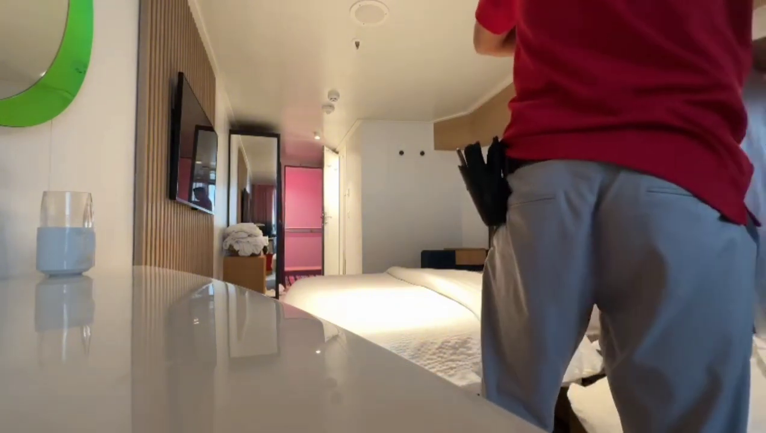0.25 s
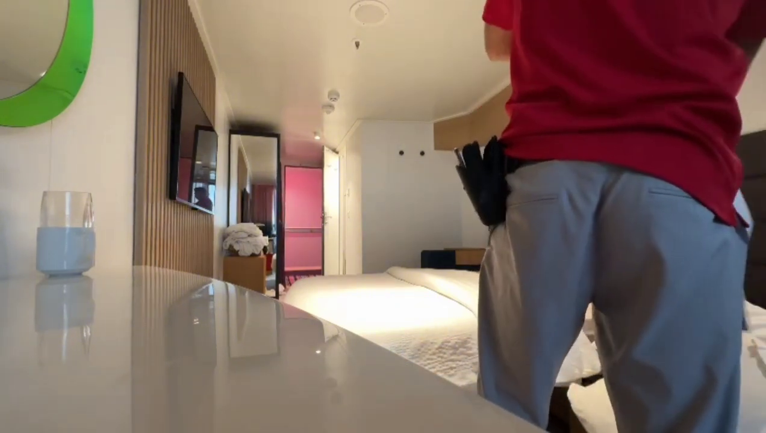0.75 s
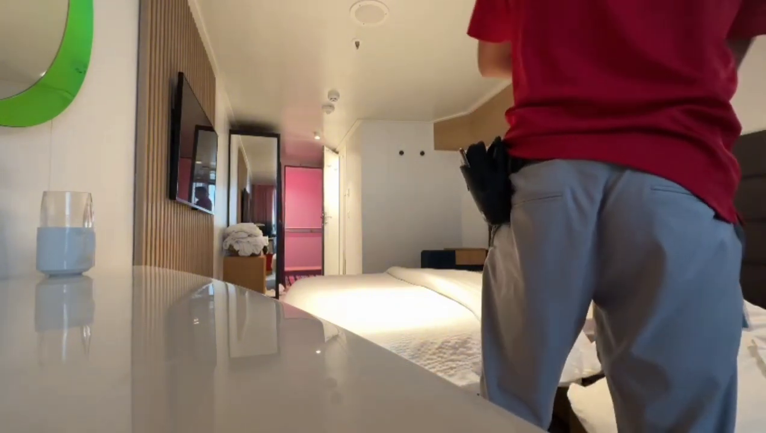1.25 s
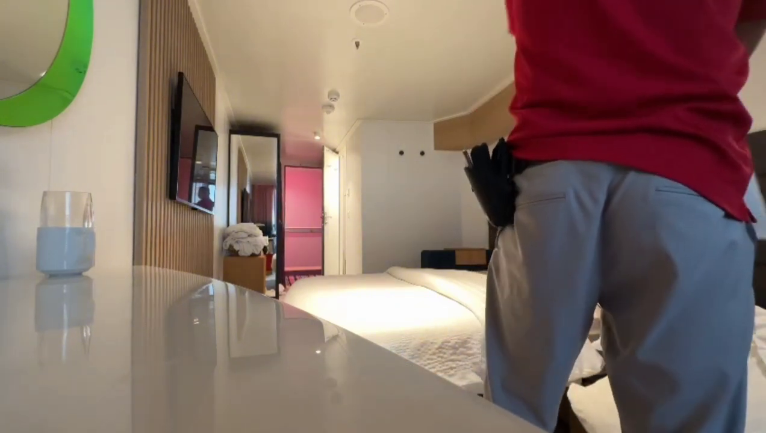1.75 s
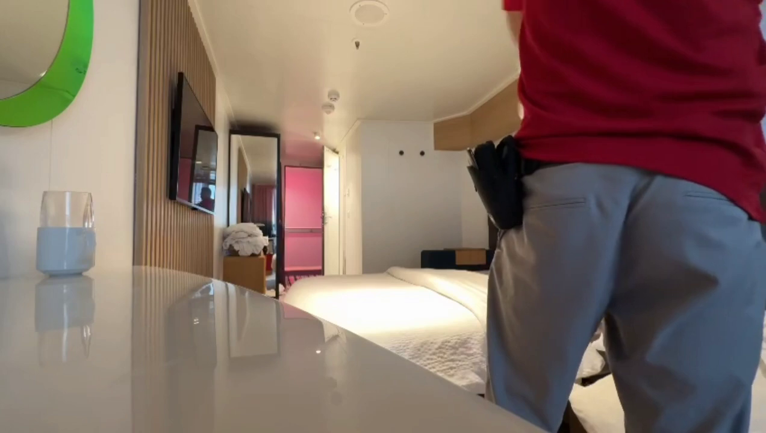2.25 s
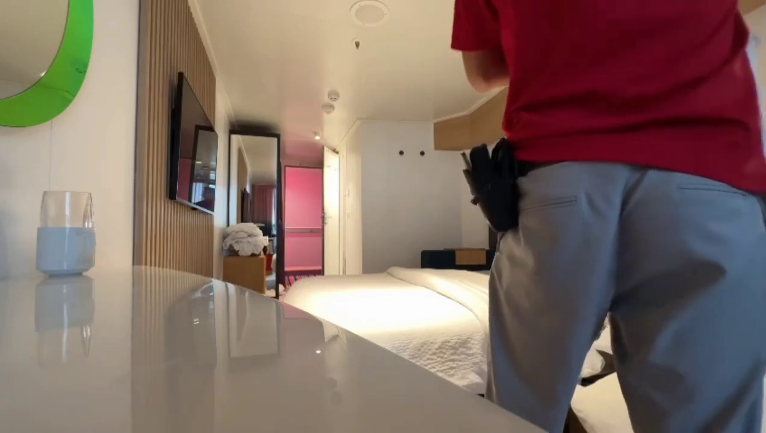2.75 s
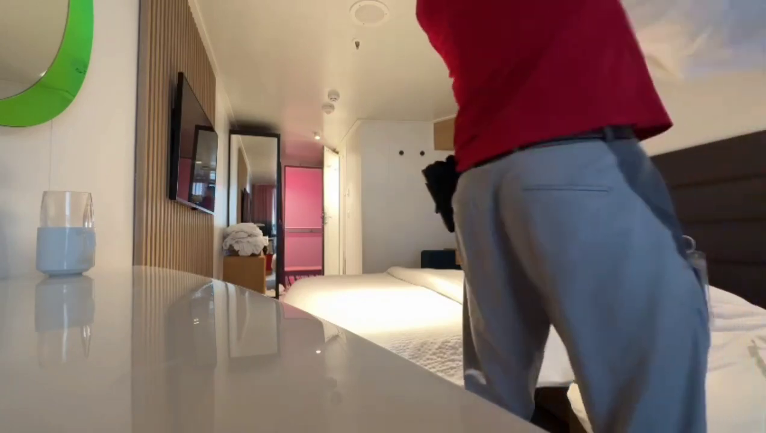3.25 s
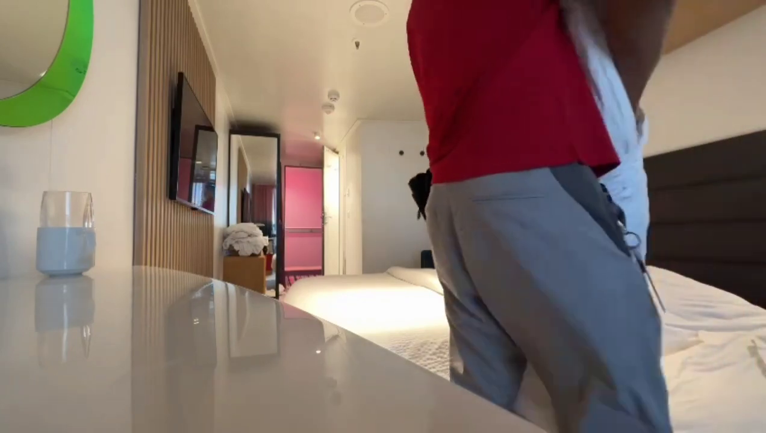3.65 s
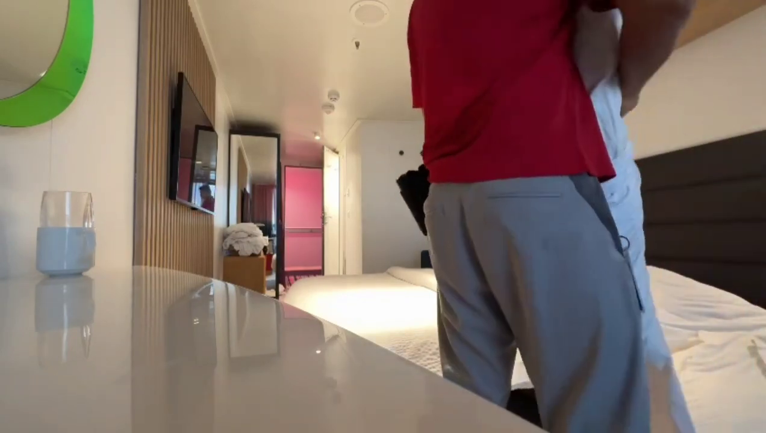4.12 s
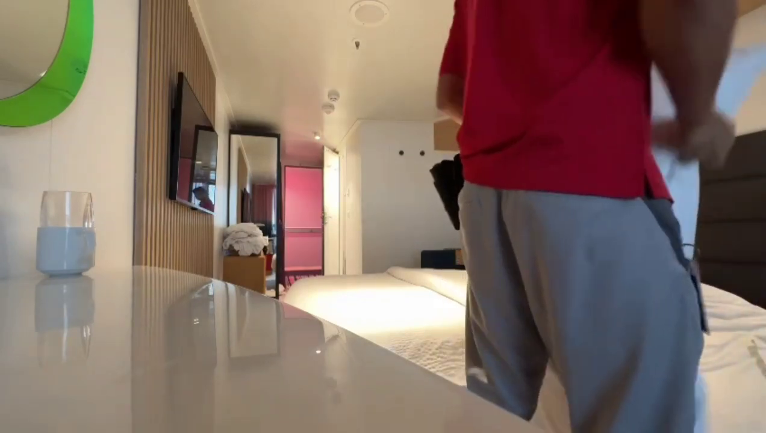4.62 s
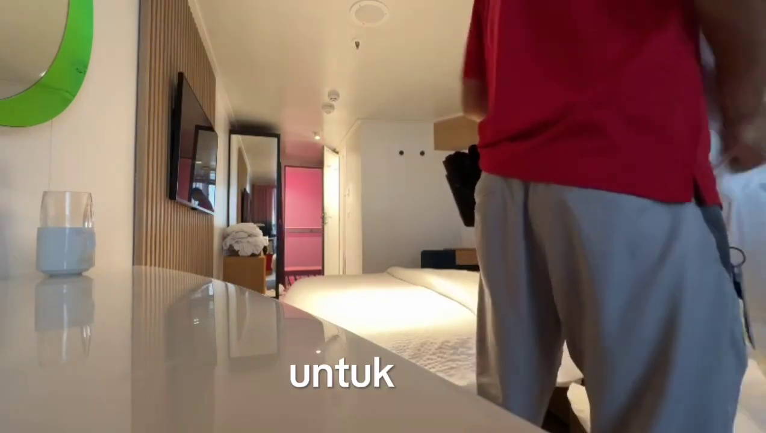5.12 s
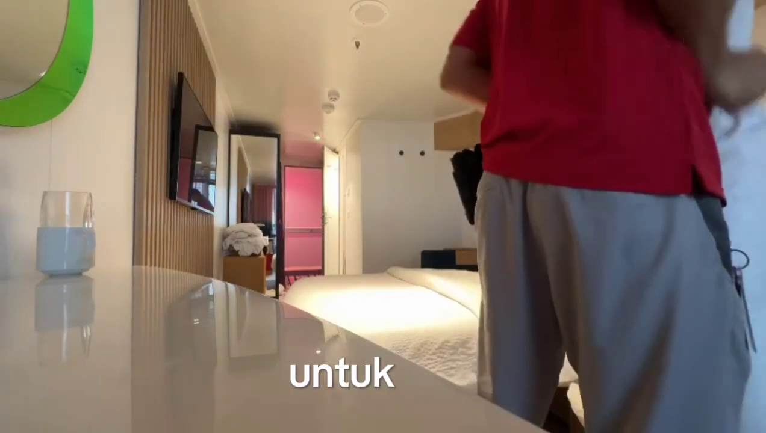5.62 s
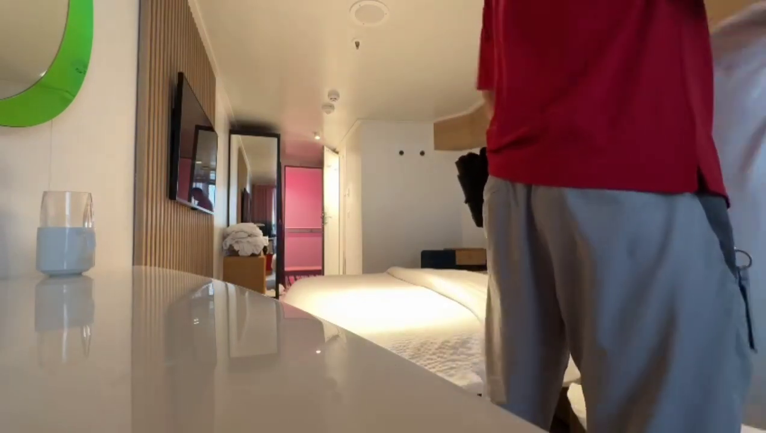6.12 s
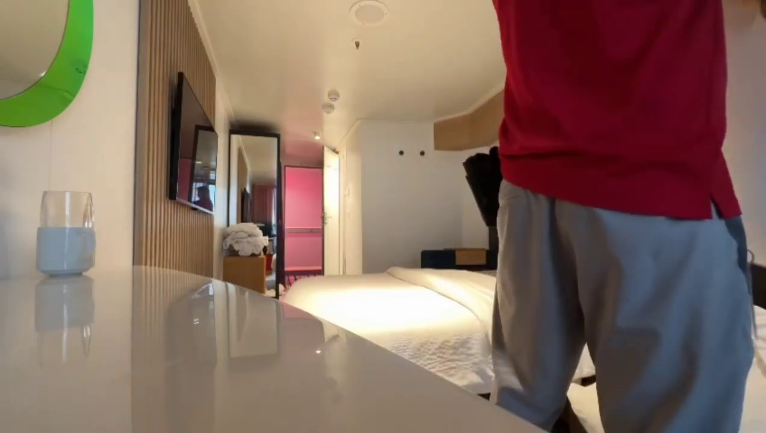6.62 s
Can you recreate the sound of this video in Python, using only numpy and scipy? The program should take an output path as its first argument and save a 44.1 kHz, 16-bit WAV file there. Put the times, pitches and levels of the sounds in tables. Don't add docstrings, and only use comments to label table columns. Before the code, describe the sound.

Cotton slides and hisses, folds flap, and seams snap taut as a pillow is shaken down into its cover. Soft air-filled thumps punctuate the rustling, strongest in four quick shakes towards the end before it settles. The cloth is close and slightly left in a dry little room, with a quiet, steady low rumble of air supply.

```python
import sys
import numpy as np
from scipy import signal
from scipy.fft import rfft, irfft
from scipy.io import wavfile
from scipy.ndimage import uniform_filter1d

SR = 44100
rng = np.random.default_rng(int(sys.argv[2]) if len(sys.argv) > 2 else 0)


def how_loud(loudness_db):
    steps = np.asarray(loudness_db, float) / 20
    return 10 ** steps


def to_wav(sig):
    pcm = np.clip(np.atleast_2d(sig), -1, 1) * 32767
    pcm = np.round(pcm).astype(np.int16)
    wavfile.write(sys.argv[1], SR, pcm.T)


N = 302967

# pitch_hz, level_db per Hz
VENT_SPECTRUM = [(12, -37), (30, -2), (91, 0.5), (160, -2.5), (244, -17), (384, -10), (925, -19),
                 (1420, -18.5), (2170, -29), (4950, -34), (7580, -42), (9400, -34.5), (10000, -71),
                 (10700, -34), (11600, -42), (15100, -68), (22000, -120)]
# pitch_hz, correlation (-1 to 1)
VENT_LIKENESS = [(60, 1), (170, 0.27), (490, -0.022), (1380, -0.44), (3920, -0.55), (11200, 1)]
VENT_DB = -48

# peak_s, air_db
HEAVES = [(1.03, -37.5), (1.2, -34.5), (1.78, -50), (1.99, -39), (2.22, -36), (2.71, -35.5), (3.33, -45.5),
          (3.6, -25.5), (5.19, -37), (5.3, -38), (5.53, -25), (5.791, -27.5), (6.02, -28), (6.24, -31.5),
          (6.64, -41), (6.76, -45.5)]
# pitch_hz, level_db per Hz
AIR_SPECTRUM = [(12, -43), (30, 1.5), (81, 7.5), (226, -5.5), (260, -6), (340, -67), (570, -120)]
HEAVE_FADE_MS, HEAVE_RISE, HEAVE_ROUND, AIR_REST_DB = 77, 0.78, 0.84, -46

# peak_s, hiss_db, fade_ms (to fall 20 dB)
STROKES = [(0.308, -53.5, 127), (0.534, -53, 114), (0.752, -47, 121), (1.014, -47, 185), (1.182, -52, 103),
           (1.335, -56.5, 302.5), (1.428, -48, 105), (1.567, -59.5, 118), (1.703, -70, 142),
           (1.993, -58.5, 110), (2.216, -41.5, 115), (2.39, -57.5, 131), (2.671, -48.5, 142),
           (2.839, -57, 121), (3.197, -56.5, 327), (3.49, -53.5, 369), (3.584, -52.5, 184),
           (3.786, -52, 155), (4.14, -62.5, 400), (4.368, -55, 232), (4.59, -56, 101), (4.721, -63.5, 169),
           (4.917, -54.5, 168), (5.216, -47, 110), (5.519, -40.5, 64), (5.773, -43.5, 60),
           (6.011, -43.5, 87), (6.241, -48.5, 150), (6.61, -56, 178), (6.77, -54, 219)]
# pitch_hz, level_db per Hz
HISS_SPECTRUM = [(880, -10.5), (1500, 2), (2020, -4.5), (2640, -5), (2870, -5.5), (5140, -3.5), (5600, -5),
                 (9500, -5.5), (10000, -11.5), (10500, -4), (11700, -13), (13000, -44)]
# time_s, level_db
FIDGET = [(0, -71), (.62, -69.5), (1.25, -68), (1.87, -72.5), (2.5, -62.5), (3.0, -77), (3.75, -75),
          (4.37, -64), (5.0, -61), (5.62, -57.5), (6.0, -60.5), (6.45, -76.5), (6.87, -86.5)]
STROKE_RISE, STROKE_ROUND = 0.85, 1.18

# peak_s, flap_db, upper_folds_db (relative), fade_ms (to fall 20 dB)
WHIPS = [(0.318, -60, 13, 92), (0.531, -53, 3, 94), (0.718, -49, -2, 152), (0.798, -45, -8, 200),
         (1.029, -42.5, -2.5, 209), (1.183, -41.5, -6.5, 53), (1.415, -39, -3, 141), (1.973, -49.5, 1, 94),
         (2.171, -38, -0.2, 73), (2.237, -40.5, -3.5, 187), (2.678, -41.8, -3.7, 119),
         (2.832, -45.5, -4, 106), (3.131, -45.5, -4.5, 160), (3.233, -45, -2.5, 108), (3.415, -48, 2.5, 60),
         (3.52, -46.5, 3, 387), (3.592, -35.5, -5, 162), (3.89, -51, 1, 57), (4.403, -54, 1, 96),
         (4.596, -43.5, -5.7, 81), (4.89, -45.5, -0.5, 82), (4.954, -47.5, 3.5, 98),
         (5.209, -39.5, -2.4, 132), (5.298, -37.5, -3, 90), (5.523, -23, -1.7, 90),
         (5.776, -31.5, -4.5, 73), (6.014, -30.5, -3, 68), (6.24, -39, -0.1, 84), (6.593, -45, -4.5, 136),
         (6.747, -50.5, -0.2, 263)]
# pitch_hz, level_db per Hz
LOW_FOLDS = [(88, -39), (150, 0), (227, -9), (297, 2.5), (553, -1), (841, -9.5), (900, -15), (1170, -22.5),
             (1980, -120)]
# pitch_hz, level_db per Hz
HIGH_FOLDS = [(380, -72), (650, -3), (856, -3.5), (958, -2), (1360, -7), (1980, -16.5), (2460, -19.5),
              (3500, -23.5), (4550, -24), (7700, -120)]
WHIP_RISE, WHIP_ROUND = 0.81, 1.46
LOW_REST_DB, HIGH_REST_DB, FOLDS_FOLLOW = -58, -57.5, 0.87

# start_s, peak_db, pitch_hz, t60_s
THUMPS = [
    (1.189, -31, 71.5, 0.21),
    (2.201, -28.5, 81.6, 0.33),
    (3.583, -22.5, 79.5, 0.18),
    (5.28, -18.5, 64, 0.077),
    (5.524, -20, 196, 0.12),
    (5.789, -23, 59, 0.13),
    (6.019, -13.5, 108, 0.05),
    (6.24, -30, 102, 0.14),
]
# start_s, peak_db, pitch_hz, t60_s
SNAPS = [(0.074, -29, 660, 0.022), (0.326, -32, 806, 0.026), (0.647, -42, 483, 0.022),
         (1.007, -28, 1300, 0.019), (1.022, -25.5, 800, 0.02), (1.427, -34, 348, 0.02),
         (1.44, -24, 252, 0.0088), (2.123, -34, 600, 0.024), (2.147, -22, 490, 0.013),
         (3.222, -20.5, 690, 0.0067), (3.253, -31.5, 890, 0.011), (3.593, -22, 467, 0.032),
         (3.872, -23, 990, 0.01), (4.406, -30, 310, 0.014), (4.573, -37, 300, 0.034),
         (4.8665, -20.5, 900, 0.01), (4.959, -26.5, 343, 0.027), (5.183, -21, 344, 0.017),
         (5.458, -26, 541, 0.029), (5.476, -17, 390, 0.02), (5.533, -11.5, 278, 0.036),
         (5.5185, -15.5, 2420, 0.01), (5.5315, -2.5, 860, 0.024), (5.746, -20.5, 494, 0.023),
         (5.759, -19, 453, 0.027), (5.793, -24.5, 262, 0.017), (5.981, -20.5, 318, 0.047),
         (6.0075, -11, 322, 0.017), (6.214, -28, 330, 0.049), (6.55, -29, 325, 0.023)]

# time_s, left_minus_right_db
BEARING = [(0.0, 5.5), (0.76, 4), (0.88, 3.5), (1.78, 6), (2.16, 3.5), (2.87, 4), (3.04, 6.5), (3.56, 2),
           (3.92, 3.5), (4.11, 3.5), (4.4, 1.5), (5.07, 2.5), (5.74, 3), (5.95, 2), (6.39, 4.5), (6.52, 4),
           (6.87, 3.5)]
# pitch_hz, lead_rad
PORT_PHASE = [(0, 0.5), (520, -2.5), (1460, -1.5), (1980, -0.5), (2410, -6), (3960, -12), (4390, -13),
              (5510, -14.5), (6370, -13), (8530, -6.5), (9730, -9.5), (10100, 15.5), (10500, -17.5),
              (11300, -61.5)]
# pitch_hz, left_minus_right_db
PORT_BALANCE = [(60, 1), (110, 7), (190, 3.5), (340, 1), (610, 1.5), (1090, 2), (1950, 3.5), (3490, 2),
                (6240, 6.5), (11200, -5.5)]
# pitch_hz, margin_db
MASKED = [(400, -16), (900, -10), (1900, -7.5), (2300, -3), (3300, -3.2), (4200, -5), (6500, -6.5),
          (7500, -5), (9000, -5.5), (10000, -4), (10600, -5.5), (11700, -3.5)]
CABIN_T60_S, CABIN_DB, CABIN_SPLIT_HZ = 0.063, 0, 57
HITS_TAIL_DB = -3
SWAY_S = 0.000096


def rms_one(x):
    return x / np.sqrt(np.mean(x ** 2) + 1e-20)


def in_time(rows):
    time_s, *columns = np.transpose(rows)
    return [np.interp(np.arange(N) / SR, time_s, column) for column in columns]


def at_hz(points, hz):
    point_hz, values = np.transpose(points)
    return np.interp(np.log(hz + 1), np.log(point_hz + 1), values)


def coloured(x, spectrum):
    hz = np.fft.rfftfreq(N, 1 / SR)
    return rms_one(irfft(rfft(x) * how_loud(at_hz(spectrum, hz)), N))


def drift(rate_hz):
    r = np.exp(-40 * np.pi * rate_hz / SR)
    noise = rng.standard_normal(N // 20 + 2002)
    slow = signal.lfilter([1], [1, -2 * r, r * r], noise)[2000:]
    return np.interp(np.arange(N) / 20, np.arange(len(slow)), rms_one(slow))


def grains(per_s, spread_db, clump_db, clump_rate):
    sizes = how_loud(spread_db * np.minimum(rng.exponential(1, N), 4)) * rng.choice([-1, 1], N)
    born = rng.random(N) < per_s / SR
    return sizes * born * how_loud(clump_db * drift(clump_rate))


def evened(x, span_s):
    power = uniform_filter1d(x ** 2, max(round(span_s * SR), 1))
    return x / np.sqrt(power + 0.16)


def swells(peak_s, peak_db, fade_ms, rise, rounding, rest_db):
    t = np.arange(0, N + 64, 64) / SR
    late = (t - peak_s[:, None]) / fade_ms[:, None] * 1e3
    away = np.where(late < 0, -late / rise, late)
    power = np.sum(how_loud(2 * (peak_db[:, None] - 20 * away ** rounding)), axis=0)
    return 10 * np.log10(np.interp(np.arange(N) / SR, t, power) + how_loud(2 * rest_db))


def vent():
    alike = np.clip(at_hz(VENT_LIKENESS, np.fft.rfftfreq(N, 1 / SR)), -.99, .99)
    mid, side = rfft(rng.standard_normal((2, N)))
    pair = irfft(np.sqrt(1 + alike) * mid + np.sqrt(1 - alike) * side * [[1], [-1]], N)
    return how_loud(VENT_DB) * coloured(pair, VENT_SPECTRUM)


def push():
    peak_s, peak_db = np.transpose(HEAVES)
    fade_ms = np.full(len(peak_s), HEAVE_FADE_MS)
    level_db = swells(peak_s, peak_db, fade_ms, HEAVE_RISE, HEAVE_ROUND, AIR_REST_DB)
    lumpy = rng.standard_normal(N) * how_loud(drift(3.3))
    return how_loud(level_db - 3.0) * coloured(lumpy, AIR_SPECTRUM)


def slide():
    level_db = swells(*np.transpose(STROKES), STROKE_RISE, STROKE_ROUND, in_time(FIDGET)[0])
    threads = grains(15000, 1.7, clump_db=0.5, clump_rate=216)
    return how_loud(level_db + 4.5) * coloured(threads, HISS_SPECTRUM)


def flap():
    peak_s, low_peak_db, upper_db, fade_ms = np.transpose(WHIPS)
    busy_db = in_time(FIDGET)[0]
    busy_db = FOLDS_FOLLOW * (busy_db - busy_db.mean())
    low_db = swells(peak_s, low_peak_db, fade_ms, WHIP_RISE, WHIP_ROUND, LOW_REST_DB + busy_db)
    high_db = swells(peak_s, low_peak_db + upper_db, fade_ms, WHIP_RISE, WHIP_ROUND,
                     HIGH_REST_DB + busy_db)
    jerks = how_loud(0.74 * drift(38))
    large = coloured(jerks * grains(700, 4.1, clump_db=2.3, clump_rate=8.7), LOW_FOLDS)
    small = coloured(jerks * grains(1500, 0.67, clump_db=2.0, clump_rate=45), HIGH_FOLDS)
    return how_loud(low_db + 2.42) * evened(large, 0.11) + how_loud(high_db + 0.56) * evened(small, 0.09)


def blows(events, gain_db, rise_s, noisy):
    out = np.zeros(N + SR)
    t = np.arange(SR // 4) / SR
    for start_s, peak_db, pitch_hz, t60_s in events:
        puff = rng.standard_normal(len(t))
        r = np.exp(-np.pi * .9 * pitch_hz / SR)
        resonance = [0.91, 0.0023, -0.942, 1, -2 * r * np.cos(2 * np.pi * pitch_hz / SR), r * r]
        ragged = rms_one(signal.sosfilt([resonance, resonance], puff))
        shape = (1 - np.exp(-t / rise_s)) * how_loud(-60 * t / max(t60_s, .005))
        ring = np.sin(2 * np.pi * pitch_hz * t) + noisy * ragged
        i = round(start_s * SR)
        out[i:i + len(t)] += how_loud(peak_db + gain_db) * shape / shape.max() * ring
    return out[:N]


def thump():
    return blows(THUMPS, gain_db=-10.5, rise_s=0.024, noisy=0.64)


def snap():
    return blows(SNAPS, gain_db=-2.0, rise_s=0.0008, noisy=0.39)


def cabin(cloth, hits):
    hop, size, headroom = 2048, 8192, 256
    hz, t = np.fft.rfftfreq(size, 1 / SR), np.arange(2 * hop) / SR
    sign = np.array([[.5], [-.5]])
    lead = np.exp(-2j * np.pi * hz * headroom / SR)
    direct = np.exp(1j * sign * np.interp(hz, *np.transpose(PORT_PHASE)))
    apart = hz ** 2 / (hz ** 2 + CABIN_SPLIT_HZ ** 2)
    fade = how_loud(-60 * t / CABIN_T60_S) * (t > .003)
    fade = fade / np.sqrt(np.sum(fade ** 2))
    balance = how_loud(sign * at_hz(PORT_BALANCE, hz)) * lead / np.sqrt(1 + how_loud(2 * CABIN_DB))
    sources = [cloth + hits, cloth + how_loud(HITS_TAIL_DB) * hits]
    padded = np.pad(sources, ((0, 0), (hop, 2 * hop)))
    out = np.zeros((2, N + hop + size))
    swing = drift(6.1)
    window = np.sin(np.pi * np.arange(2 * hop) / (2 * hop))
    for i in range(0, N + hop, hop):
        shared, *own = rfft(rng.standard_normal((3, 2 * hop)) * fade, size)
        diffuse = np.sqrt(1 - apart) * shared + np.sqrt(apart) * np.array(own)
        sway = (2 * np.pi * hz * SWAY_S + 0.59 * apart) * swing[min(i, N - 1)]
        swung = direct * np.exp(1j * sign * sway)
        near, far = rfft(padded[:, i:i + 2 * hop] * [window ** 2, window], size)
        out[:, i:i + size] += irfft((near * swung + far * how_loud(CABIN_DB) * diffuse) * balance, size)
    start = hop + headroom
    return out[:, start:start + N]


def thin(x, depth_db):
    hz, _, z = signal.stft(x, SR, nperseg=1024, noverlap=768)
    power = np.abs(z) ** 2 + 1e-20
    lasting = uniform_filter1d(power, size=5, axis=2)
    narrow = uniform_filter1d(lasting, size=5, axis=1)
    around = uniform_filter1d(lasting, size=31, axis=1)
    margin_db = 10 * np.log10(narrow / around) - at_hz(MASKED, hz)[:, None]
    keep = how_loud(depth_db / (0.5 + np.exp(np.clip(margin_db / 0.085, -30, 30))))
    return signal.istft(z * keep, SR, nperseg=1024, noverlap=768)[1][:, :N]


def scene():
    cloth = slide() + flap() + push()
    hits = snap() + thump()
    turned = how_loud((in_time(BEARING)[0] - 3.0) * np.array([[.5], [-.5]]))
    return turned * cabin(cloth, hits) + vent()


def band_limit(x):
    return signal.sosfilt(signal.butter(12, 11750, fs=SR, output="sos"), x)


def record(dry):
    turn = np.array([[1, 0.95], [1, -0.93]])
    rounded = .6 * np.tanh(dry / .6)
    mid_side = thin(turn @ rounded / 2, depth_db=-21)
    return band_limit(turn @ mid_side)


dry = scene()
out = record(dry)
to_wav(out)
```